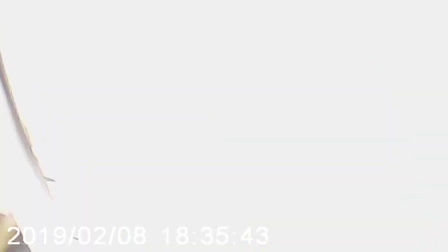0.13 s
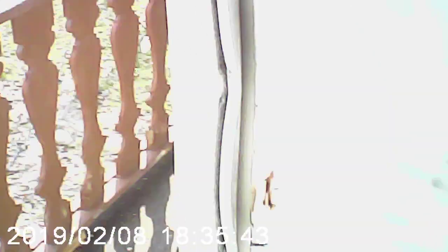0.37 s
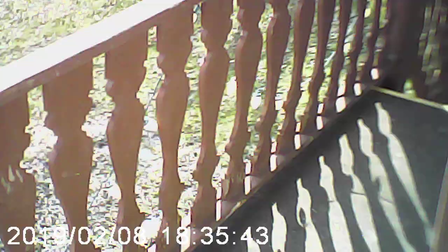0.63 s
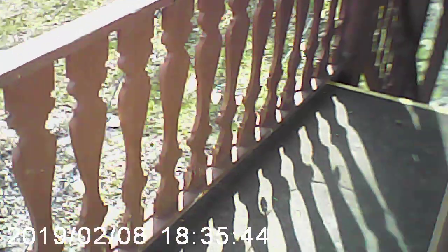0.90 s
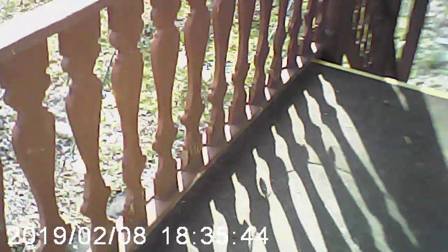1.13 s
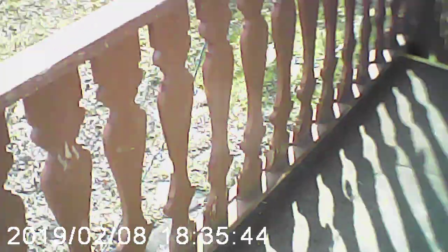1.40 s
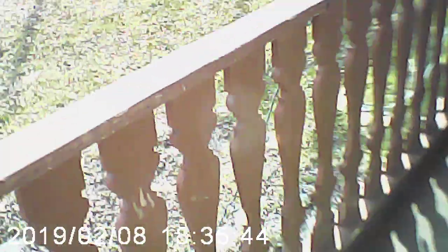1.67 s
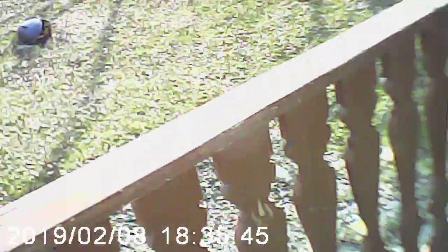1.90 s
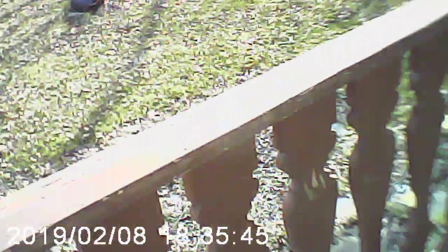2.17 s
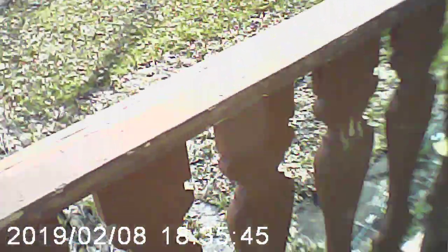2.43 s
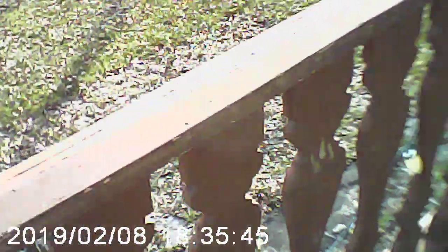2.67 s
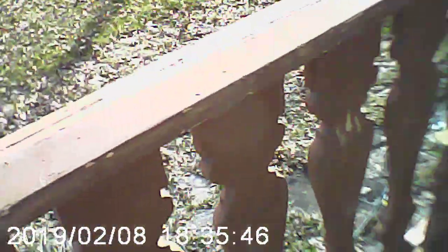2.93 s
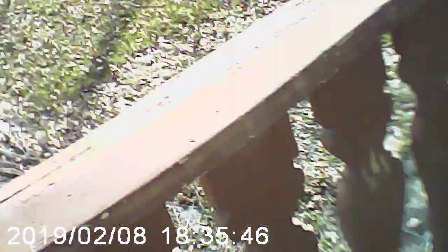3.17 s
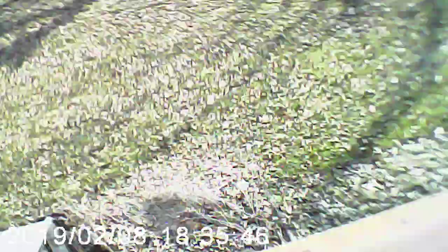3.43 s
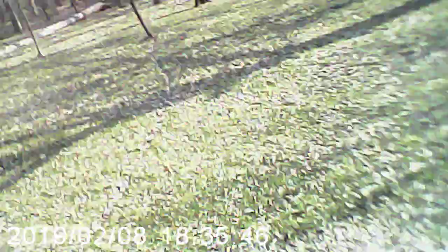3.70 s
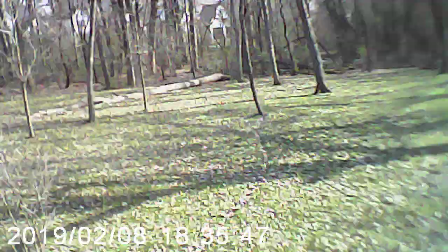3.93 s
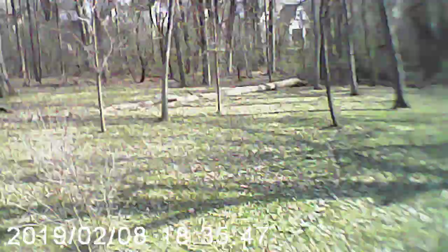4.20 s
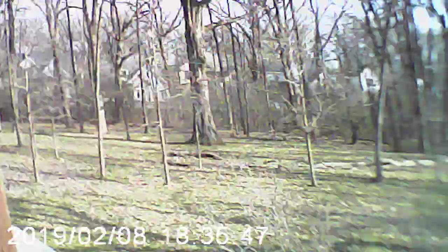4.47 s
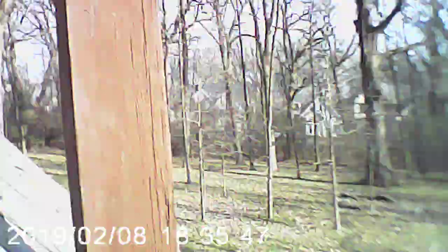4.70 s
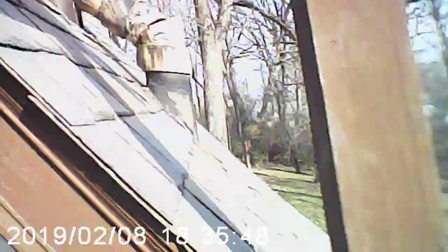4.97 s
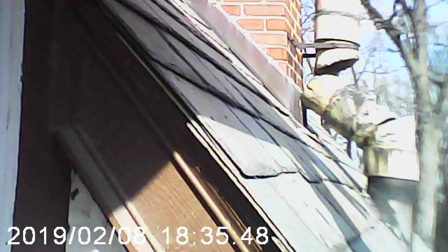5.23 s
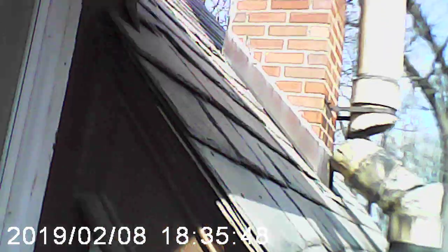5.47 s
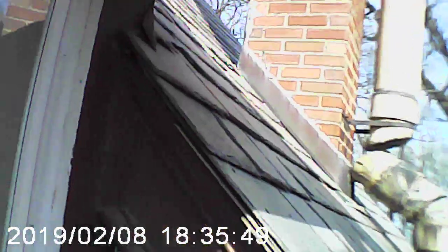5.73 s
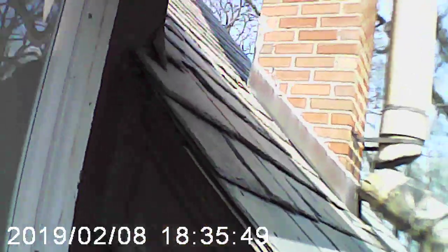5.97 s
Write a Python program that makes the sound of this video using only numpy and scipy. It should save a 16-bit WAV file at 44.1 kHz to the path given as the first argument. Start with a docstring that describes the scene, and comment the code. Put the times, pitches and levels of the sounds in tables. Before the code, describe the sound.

On an outdoor wooden balcony, a small handheld camera picks up dull distant traffic, low wind, hiss and static pulsing seven times a second. Fingers tick and rub its plastic case, a hinge squeaks faintly, a latch jingles, then heavy heel thumps rattle the boards and clip harshly. After a few sharp knocks and light taps, the background gradually quietens.

```python
"""Traffic roars far off, electronics hiss with a short burst of static seven times a second, then heels
thump a wooden balcony hard enough to overload a small handheld camera, fingers rub and tap its plastic
case, a hinge squeaks and a latch jingles. Traffic, wind, hiss and static are shaped noise; boards, case
and latch are sums of modes; knocks are damped pressure swings; the squeak is a wavering note."""
import sys
import numpy as np
from scipy import signal
from scipy.fft import rfft, irfft
from scipy.io import wavfile
from scipy.ndimage import uniform_filter1d

SR = 44100
rng = np.random.default_rng(int(sys.argv[2]) if len(sys.argv) > 2 else 0)


def transcribe(u):
    """Save the signal u as a 16-bit wav file named by the first command-line argument.

    u: samples, shape (n,) or (channels, n), limited to [-1, 1]; the rate is SR.
    q: integer samples, one column per channel.
    """
    v = np.clip(np.atleast_2d(u).T, -1, 1)
    q = np.round(v * 32767).astype(np.int16)
    wavfile.write(sys.argv[1], SR, q)


def voltage_ratio(decibels):
    """Convert decibels (scalar or array-like) to amplitude ratios, 20 dB per decade."""
    exponent = np.asarray(decibels, float) / 20
    return 10 ** exponent


N = 269451

# Far traffic, louder beside the open door, fading as the camera turns away. Each row: time in seconds,
# roar rms in dB, rms of the lower and of the upper hollow porch ring in dB.
TRAFFIC_LEVELS = [(0.0, -34, -35.5, -41.5), (0.6, -31.5, -36, -46), (1.0, -31.5, -26.5, -38),
                  (1.55, -29, -28, -35), (2.0, -28.5, -30.5, -38), (2.6, -30, -29.5, -39),
                  (3.1, -33, -28, -43.5), (3.55, -28.5, -30.5, -39), (3.8, -29, -35, -40),
                  (4.5, -32.5, -42.5, -44.5), (5.3, -36.5, -44, -46), (6.11, -38, -42, -45)]
# Roar spectrum before scaling to rms 1. Each row: frequency in Hz, density in dB per Hz.
ROAR_SPECTRUM = [(250, -5.5), (420, 5.5), (537, 3), (630, -15.5), (660, -3), (1020, -17.5), (1730, -20.5),
                 (2190, -17.5), (2500, -24.5), (4000, -37), (5200, -27), (8800, -120)]
# Low rumble level. Each row: time in seconds, rms in dB.
RUMBLE_LEVELS = [(0.0, -36), (0.5, -29.5), (2.0, -34.5), (3.1, -38), (4.0, -35), (5.0, -36), (6.11, -39.5)]
# Rumble spectrum before scaling to rms 1. Each row: frequency in Hz, density in dB per Hz.
RUMBLE_SPECTRUM = [(76, -58), (130, -6.5), (150, -8), (248, -2), (338, -3), (450, -13.5), (580, -35),
                   (990, -120)]
# Lower ring, upper ring, whistle. Each row: frequency in Hz, width of one of two passes in Hz.
PORCH_RINGS = [(580, 81), (1030, 210), (2220, 240)]
# Wind on the microphone. Each row: time in seconds, rms in dB.
WIND_LEVELS = [(0.0, -31), (1.1, -31.5), (1.9, -28.5), (3.0, -29), (4.3, -34.5), (4.8, -32), (6.11, -34.5)]
# Wind spectrum before scaling to rms 1. Each row: frequency in Hz, density in dB per Hz.
WIND_SPECTRUM = [(8.8, -34), (15, 6.5), (27, -7.5), (70, 3), (124, -12), (151, -22), (200, -42), (260, -60),
                 (440, -120)]
# Modes of the plastic case. Each row: frequency in Hz, width of one of two passes in Hz,
# relative level under soft cloth in dB, under hard skin or nail in dB.
CASE_MODES = [(946, 430, -0.5, 0.5), (1420, 870, -14, -14), (1810, 210, -9, 2.5), (2257, 340, 5, 3.5),
              (2900, 530, -5, -0.5), (3350, 830, -13, -6.5), (4010, 1600, -14, -6.5), (4600, 580, -3, -1),
              (5046, 650, -1.5, -6.5), (5830, 630, -14.5, -7.5), (6500, 690, -29, -11),
              (7290, 1010, -19.5, -6), (8510, 1400, -22, -9)]
# Sliding on the case. Each row: start in seconds, length in seconds, cloth rms in dB, skin rms in dB,
# brightness in dB per octave.
RUBS = [(0.288, 0.23, -46.5, -51, 2), (0.434, 0.039, -42.5, -40, 0), (0.603, 0.047, -40.5, -49, -5),
        (0.898, 0.34, -48, -51.5, -7.5), (1.346, 0.25, -41.5, -50.5, -7), (1.75, 0.15, -46, -64, -24),
        (2.169, 0.1, -45.5, -73.5, 2), (2.238, 0.11, -32.5, -32, -6), (2.359, 0.04, -40.5, -60, -8.5),
        (2.539, 0.22, -31, -57, -5.5), (2.652, 0.04, -28, -29.5, -10.5), (2.892, 0.045, -42.5, -60.5, -4.5),
        (3.411, 0.037, -44.5, -21, -3), (3.462, 0.038, -40.5, -35, 0.5), (3.599, .012, -44.5, -45, 2),
        (3.61, 0.12, -27.5, -30.5, 4), (3.71, 0.12, -45, -60, 4), (3.891, 0.05, -42, -40, -2),
        (3.92, 0.15, -42.5, -60, 0), (4.081, 0.085, -38.5, -49, 4), (4.375, 0.13, -42, -40, -0.5),
        (4.593, 0.15, -53, -70, 1.5)]
# Light ticks on the case. Each row: time in seconds, peak in dB, pitch that rings most in Hz.
CASE_TICKS = [(0.2906, -28.5, 2270), (0.3202, -25.5, 2250), (.3606, -20, 2250), (.388, -24.5, 3000),
              (.4399, -27, 3500), (.615, -23.5, 2250), (0.633, -27, 6500), (0.724, -23.5, 4080),
              (.7437, -31, 3500), (0.941, -26.5, 2750), (1.2875, -27, 2900), (1.4486, -25.5, 2660),
              (2.3057, -5.5, 2230), (2.3769, -25.5, 2250), (2.9038, -23.5, 2400), (3.5266, -27, 4740),
              (3.764, -34.5, 5000), (3.79, -26.5, 5100), (3.817, -34, 5020), (4.0876, -27, 2380),
              (4.1022, -24, 5230), (4.148, -20, 2220), (4.2363, -31, 3500), (4.407, -21, 4370),
              (4.661, -32, 4900), (4.7284, -29.5, 5170)]
# Heels, toes and a hand thump on the boards. Each row: time in seconds, boom level before its soft onset in dB,
# boom pitch in Hz, rattle peak in dB, decay time constant of the shaking in seconds.
STEPS = [(0.445, -25.5, 136, -9.5, 0.029), (0.8436, -14.5, 114.4, -8.5, 0.008),
         (2.237, 9, 113.6, 0.5, 0.039), (2.245, 0.5, 34, -13.5, 0.032), (2.291, 1, 70, -0.5, 0.032),
         (2.578, -31.5, 101, -9.5, 0.14), (2.6485, 6, 86.9, 2, 0.022), (2.681, -2.5, 150, -2.5, 0.024),
         (3.4168, 7, 82.3, -3.5, 0.0096), (3.9065, -16, 80, -12, 0.0035), (2.6531, 2.5, 38.1, -6, .03), ]
# Loose boards and rail. Each row: frequency in Hz, relative level in dB, t60 in seconds.
DECK_MODES = [(70, -8, 0.018), (150, -1.5, 0.053), (193.4, -7.5, 0.089), (246.5, -3.5, 0.064),
              (313, -5.5, 0.084), (403.6, -0.5, 0.061), (519.8, -1, 0.06), (650, -9, 0.093),
              (926, -7.5, 0.015), (1515, -20, 0.033)]
# How long the structure booms. Each row: pitch in Hz, t60 in seconds.
BOOM_DECAYS = [(32, 0.27), (38, .58), (70, 0.055), (81, 0.057), (88, .2), (112, 0.27), (140, 0.19)]
# Knocks that push the microphone membrane. Each row: time in seconds, push peak in dB,
# half-swing length in ms, direction +-1, crack level in dB.
KNOCKS = [(.8422, -12.5, 1.24, -1, -45), (0.8457, -5, 1.74, -1, -40), (1.599, -19, 1.75, 1, -43),
          (3.4262, 0, 1, 1, -11), (3.429, -3, .6, -1, -19), (3.4493, -1, 2.5, 1, -20.5),
          (3.455, -14, 3, 1, -26.5), (3.716, -17, 1.6, 1, -28), (3.9053, -5, 1.35, -1, -14),
          (3.93, -9.5, 0.66, -1, -17), (3.931, -16.5, 14.6, -1, -40)]
# Latch modes. Each row: frequency in Hz, t60 in seconds.
LATCH_MODES = [(4344, .3), (5846, .07), (5986, .14), (6950, .17)]
# Latch blows. Each row: time in seconds, clatter rms in dB, level in dB of a mode at the favoured pitch,
# that pitch in Hz.
JINGLES = [(1.529, -46, -39, 5900), (1.531, -61, -47, 4344), (1.563, -68, -45, 4344),
           (1.665, -34.5, -25, 5840), (1.682, -43, -33, 6160), (1.76, -47, -36, 6550)]


def unit_rms(x):
    """Scales to rms 1."""
    return x / np.sqrt(np.mean(x ** 2) + 1e-20)


def add(mix, start_s, sound):
    """Mixes a sound in at a time, cut at the end of the mix."""
    part = mix[round(start_s * SR):][:len(sound)]
    part += sound[:len(part)]


def gain_curves(rows):
    """Interpolates each dB column over time, as gains per sample."""
    row_s, *columns_db = np.transpose(rows)
    return [voltage_ratio(np.interp(np.arange(N) / SR, row_s, db)) for db in columns_db]


def resonate_twice(x, hz, width_hz):
    """Two equal two-pole resonances in a row, gain 1 at the centre."""
    b, a = signal.iirpeak(hz, hz / width_hz, SR)
    return signal.lfilter(b, a, signal.lfilter(b, a, x))


def ring(hz, t60_s, rise_s=0.0013):
    """One dying mode with a soft onset, half a second long."""
    t = np.arange(SR // 2) / SR
    return np.sin(2 * np.pi * hz * t) * voltage_ratio(-60 * t / t60_s) * (1 - np.exp(-t / rise_s))


def lumpy_noise(spectrum, patchy_db):
    """Noise of a given spectrum whose level drifts in patches of time and pitch, rms 1."""
    frames, bins = N // 256 + 5, 513
    real, imag, patches = rng.standard_normal((frames, bins, 3)).T
    patches = uniform_filter1d(patches, size=8, axis=0)
    patches = unit_rms(uniform_filter1d(patches, size=8, axis=1))
    stft = (real + 1j * imag) * voltage_ratio(patchy_db * patches)
    noise = signal.istft(stft, nperseg=1024, noverlap=768)[1][:N]
    hz, db = np.transpose(spectrum)
    fine_hz = np.fft.rfftfreq(N, 1 / SR)
    shape = voltage_ratio(np.interp(np.log(fine_hz + 1), np.log(hz + 1), db))
    return unit_rms(irfft(rfft(noise) * shape, N))


def through_case(x, column, weight_db):
    """The case modes colour whatever touches it; weight_db favours some by their pitch."""
    x = np.r_[x, np.zeros(1500)]  # room to ring on
    out = np.zeros(len(x))
    for k, mode in enumerate(CASE_MODES):
        hz, width_hz = mode[:2]
        sign = (-1) ** k
        out += sign * voltage_ratio(mode[column] + weight_db(hz)) * resonate_twice(x, hz, width_hz)
    return out


def traffic():
    """Distant engines and tyres as low rumble plus roar, both smooth-spectrum noise."""
    roar_gain = gain_curves(TRAFFIC_LEVELS)[0]
    rumble_gain = gain_curves(RUMBLE_LEVELS)[0]
    rumble = rumble_gain * lumpy_noise(RUMBLE_SPECTRUM, patchy_db=1.3)
    return rumble + roar_gain * lumpy_noise(ROAR_SPECTRUM, patchy_db=1.3)


def porch_rings():
    """Hollow porch resonances on noise, and a faint whistle that follows the upper and swells once."""
    _, lower, upper = gain_curves(TRAFFIC_LEVELS)
    whistle = upper * voltage_ratio(-11.5)
    white = rng.standard_normal((len(PORCH_RINGS), N))
    out = np.zeros(N)
    for gain, noise, (hz, width_hz) in zip((lower, upper, whistle), white, PORCH_RINGS):
        out += gain * unit_rms(resonate_twice(noise, hz, width_hz))
    middle_s, half_s, swell_db, swell_width_hz = 5.27, 0.23, -48.5, 90
    swell = voltage_ratio(swell_db) * np.exp(-((np.arange(N) / SR - middle_s) / half_s) ** 2)
    whistle_hz = PORCH_RINGS[-1][0]
    return out + swell * unit_rms(resonate_twice(white[-1], whistle_hz, swell_width_hz))


def wind():
    """Turbulence on the microphone: patchy low noise."""
    return gain_curves(WIND_LEVELS)[0] * lumpy_noise(WIND_SPECTRUM, patchy_db=4.0)


def electronics():
    """Steady white hiss, and square-edged bursts of white static."""
    hiss_db, static_db, static_s = -46.5, -37.5, 0.0175
    # bursts are due at an even pace but snap back to the tick just passed of a faster clock
    first_s, clock_s, clocks_per_burst, clock_lead = 0.03574, 0.01108, 12.7094, 0.7
    due_clocks = np.arange(N // SR * 8) * clocks_per_burst + clock_lead
    gate = np.zeros(N)
    for start_s in first_s + clock_s * np.floor(due_clocks):
        add(gate, start_s, np.ones(round(static_s * SR)))
    hiss, static = rng.standard_normal((2, N))
    return voltage_ratio(hiss_db) * hiss + voltage_ratio(static_db) * gate * static


def rubs():
    """Sliding makes dense uneven micro-slips that excite the case."""
    out = np.zeros(N)
    spikes_db = 3.2 * np.minimum(rng.exponential(1, N), 5)
    clumps = unit_rms(uniform_filter1d(rng.standard_normal(N), size=200))
    grit = rng.standard_normal(N) * voltage_ratio(spikes_db + 3.0 * clumps)
    swipe_s = 0.046  # shorter strokes land hard at once
    for start_s, length_s, cloth_db, skin_db, tilt_db in RUBS:
        u = np.linspace(0, 1, round(length_s * SR))
        hardest = 0.45 if length_s > swipe_s else 0.08  # fraction of the stroke
        pressure = np.interp(u, [0, hardest, 1], [0.25, 1, 0.25])
        stroke = pressure * signal.windows.tukey(len(u), 0.1)
        slips = stroke * grit[round(start_s * SR):][:len(u)]
        for column, db in ((2, cloth_db), (3, skin_db)):
            rub = through_case(slips, column, lambda hz: tilt_db * np.log2(hz / 3000))
            add(out, start_s, voltage_ratio(db) * unit_rms(rub))
    return out


def ticks():
    """Short noise puffs excite the case; faint extra ticks fall at chance moments as the hands move."""
    out = np.zeros(N)
    fidgets = 10
    fidget_s = rng.uniform(0.1, 5.5, fidgets)
    fidget_db = rng.uniform(-37, -32, fidgets)
    fidget_hz = rng.uniform(2200, 5200, fidgets)
    all_ticks = list(CASE_TICKS) + list(zip(fidget_s, fidget_db, fidget_hz))
    puffs = rng.standard_normal((len(all_ticks), 400)) * np.exp(-np.arange(400) / 70)
    for (start_s, peak_db, pitch_hz), puff in zip(all_ticks, puffs):
        tick = through_case(puff, -1, lambda hz: -55 * np.log2(hz / pitch_hz) ** 2)
        add(out, start_s, voltage_ratio(peak_db) * tick / abs(tick).max())
    return out


def hinge():
    """A hinge squeaks faintly: a thin wavering note and its octave."""
    start_s, length_s, hz, note_db, octave_db = 0.4, 0.1, 1850, -47, -46
    out, size = np.zeros(N), round(length_s * SR)
    waver = unit_rms(uniform_filter1d(rng.standard_normal(size), size=500))
    phase = 2 * np.pi * np.cumsum(hz * (1 + 0.004 * waver)) / SR
    note = voltage_ratio(note_db) * np.sin(phase) + voltage_ratio(octave_db) * np.sin(2 * phase)
    level = voltage_ratio(2.5 * waver[::-1])  # the waver reversed moves the loudness
    add(out, start_s, note * level * signal.windows.tukey(size, 0.3))
    return out


def steps():
    """One low mode of the structure booms under each blow while loose wood rattles."""
    out, t = np.zeros(N), np.arange(SR // 4) / SR
    deck = sum(voltage_ratio(db) * ring(hz, t60_s, rise_s=0.0007) for hz, db, t60_s in DECK_MODES)
    shakes = rng.standard_normal((len(STEPS), len(t)))
    for (start_s, boom_db, boom_hz, rattle_db, decay_s), shake in zip(STEPS, shakes):
        boom_t60_s = np.interp(boom_hz, *np.transpose(BOOM_DECAYS))
        add(out, start_s, voltage_ratio(boom_db) * ring(boom_hz, boom_t60_s, rise_s=0.005))
        rattle = signal.fftconvolve(shake * np.exp(-t / decay_s), deck)
        add(out, start_s, voltage_ratio(rattle_db) * rattle / abs(rattle).max())
    return out


def knocks():
    """A pressure push swings back and forth, shrinking ever faster, with a short noise crack."""
    out, t = np.zeros(N), np.arange(3000) / SR
    rebound_share, slow_push_ms, crack_hz = 0.69, 1.88, 3500
    cracks = rng.standard_normal((len(KNOCKS), len(t))) * np.exp(-t / 0.0019)
    cracks = 2 * signal.lfilter(*signal.butter(1, crack_hz, fs=SR), cracks)
    for (start_s, peak_db, push_ms, direction, crack_db), crack in zip(KNOCKS, cracks):
        half_swings = t * 1000 / push_ms
        rebound = rebound_share / (1 + (push_ms / slow_push_ms) ** 6)  # slow pushes hardly swing back
        push = np.sin(np.pi * half_swings) * np.clip(rebound, 0.05, 0.9) ** (half_swings ** 2 / 2)
        push *= np.sign(direction) * voltage_ratio(peak_db) / push.max()
        add(out, start_s, push + voltage_ratio(crack_db) * crack)
    return out


def latch():
    """Metal parts clatter briefly, coloured by the case, and ring on in their own modes."""
    out, t = np.zeros(N), np.arange(3000) / SR
    clatters = rng.standard_normal((len(JINGLES), len(t))) * np.exp(-t / 0.009)
    for (start_s, clatter_db, ring_db, pitch_hz), noise in zip(JINGLES, clatters):
        clatter = through_case(noise, -1, lambda hz: 1.6 * np.log2(hz / 3000))
        add(out, start_s, voltage_ratio(clatter_db) * unit_rms(clatter))
        for hz, t60_s in LATCH_MODES:
            mode_db = ring_db - 250 * np.log2(hz / pitch_hz) ** 2
            add(out, start_s, voltage_ratio(mode_db) * ring(hz, t60_s))
    return out


def scene():
    """All sources at the one microphone."""
    background = traffic() + porch_rings() + wind() + electronics()
    handling = rubs() + ticks() + hinge() + knocks() + latch()
    return (background + handling + steps())[None]


def band_limit(x):
    """A steep low-pass at the top of the band."""
    return signal.sosfilt(signal.butter(12, 15830, fs=SR, output="sos"), x)


def record(dry):
    """The input clips off-centre, a low sampling rate cuts the treble, the overshoot clips once more."""
    offset, input_ceiling, output_ceiling, edge_hz = 0.006, 0.713, 0.716, 8070
    clipped = np.clip(dry + offset, -input_ceiling, input_ceiling)
    lowpass = signal.firwin(101, edge_hz, window=("kaiser", 10), fs=SR)
    dull = signal.oaconvolve(clipped, lowpass[None], "same")
    return band_limit(np.clip(dull, -output_ceiling, output_ceiling))


dry = scene()
out = record(dry)
transcribe(out)
```